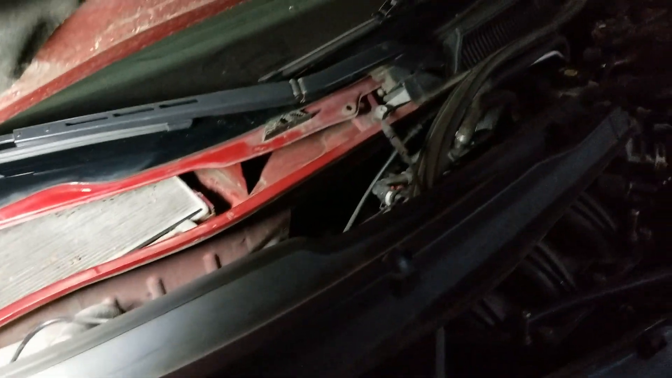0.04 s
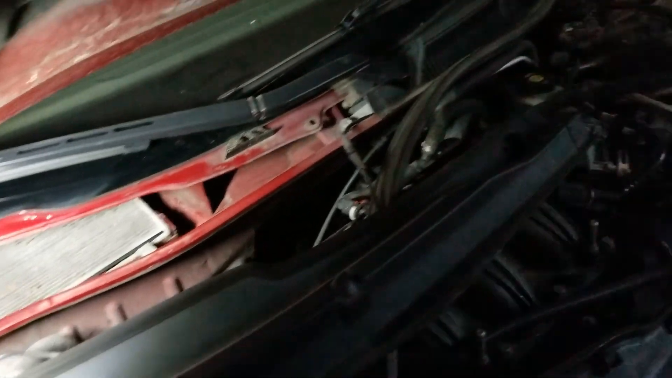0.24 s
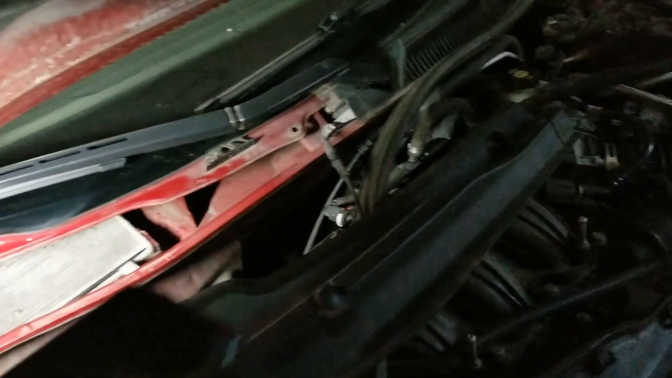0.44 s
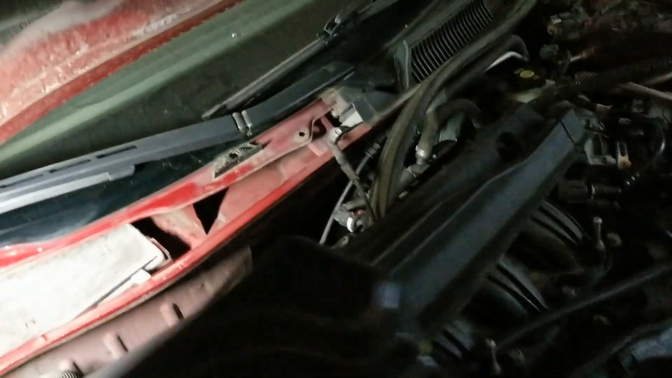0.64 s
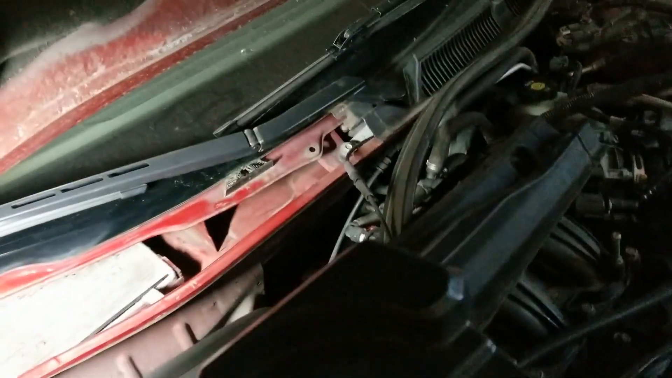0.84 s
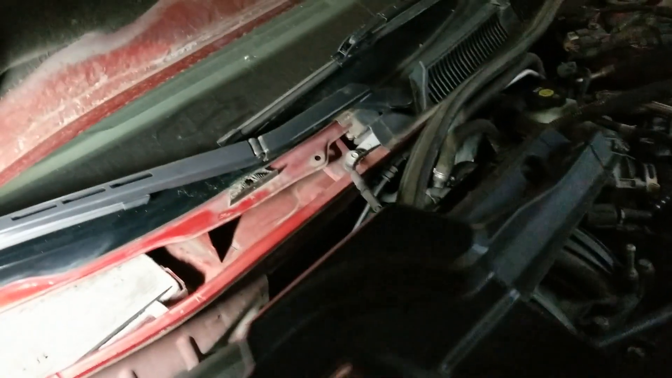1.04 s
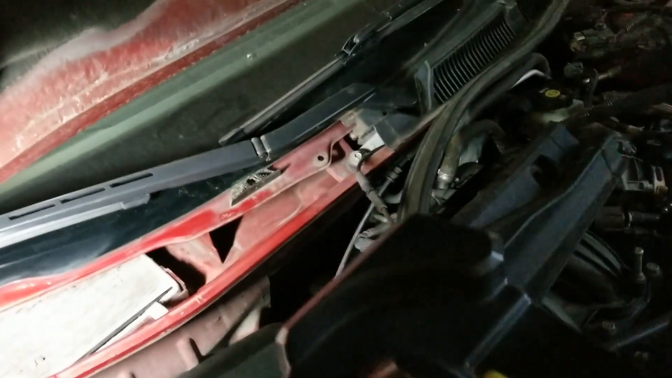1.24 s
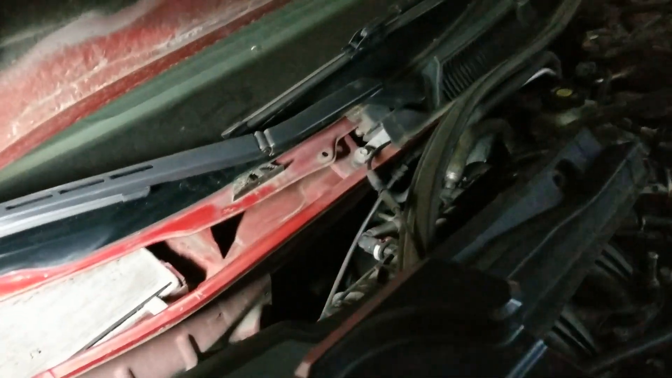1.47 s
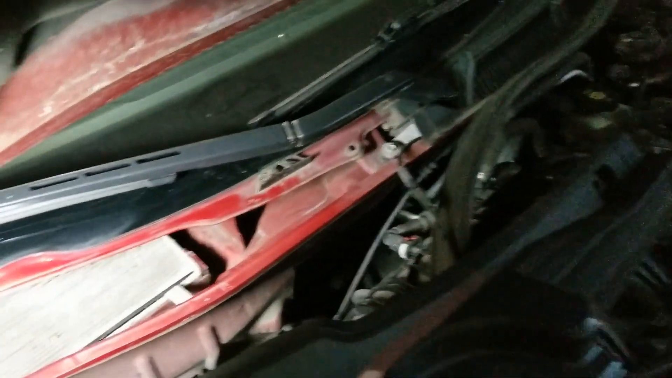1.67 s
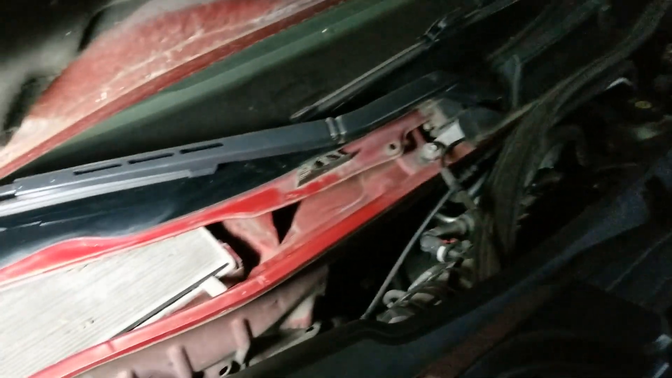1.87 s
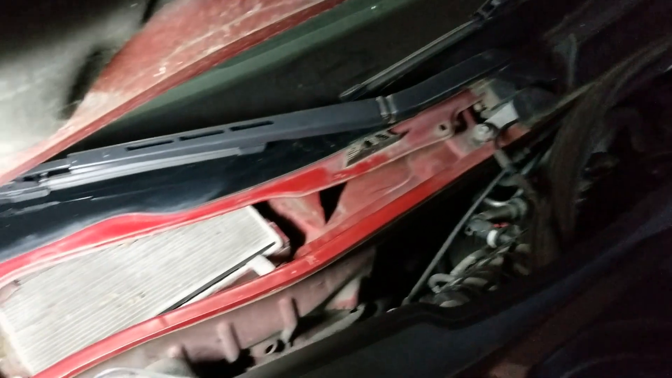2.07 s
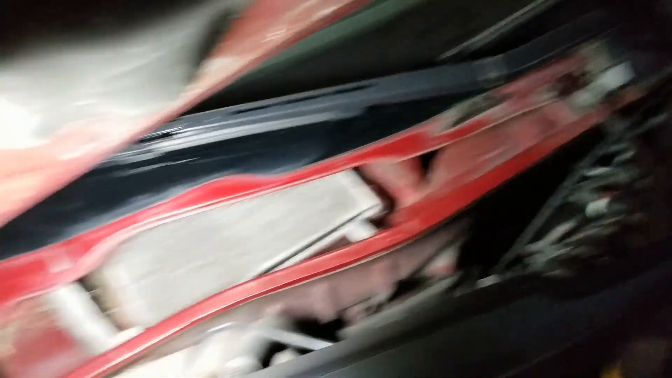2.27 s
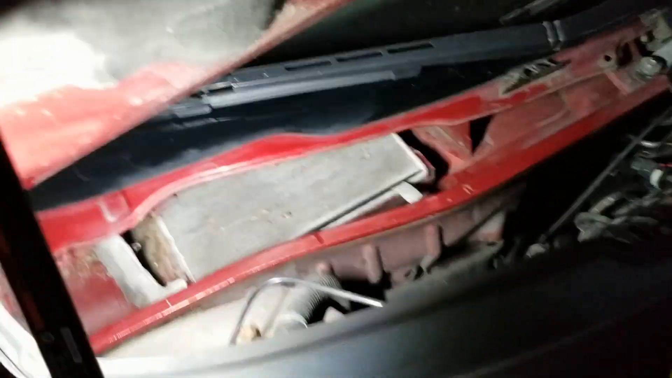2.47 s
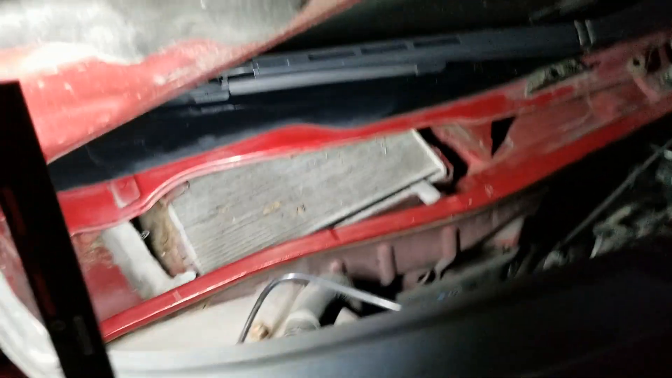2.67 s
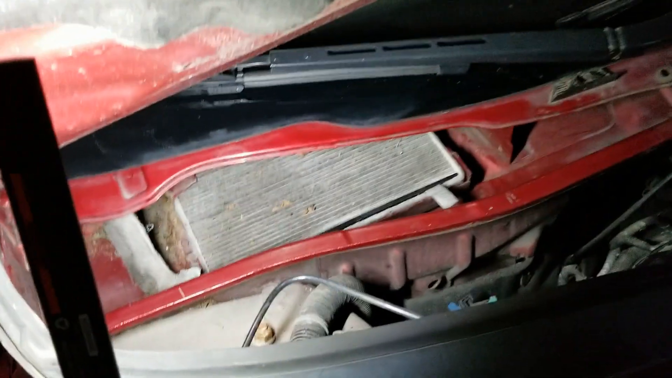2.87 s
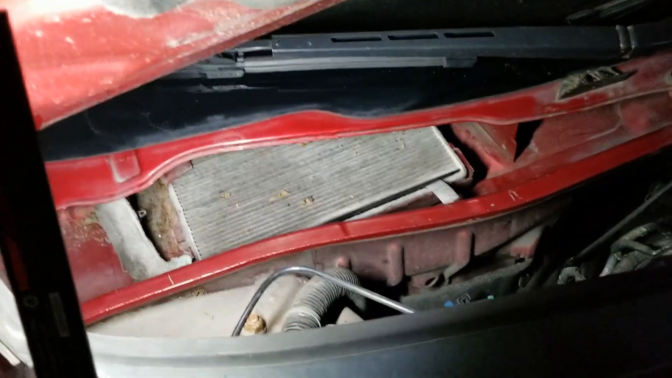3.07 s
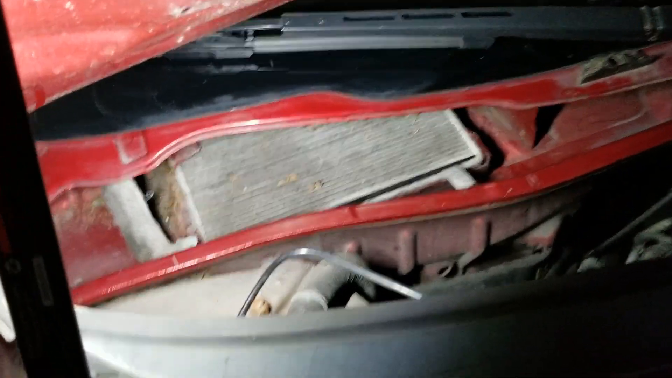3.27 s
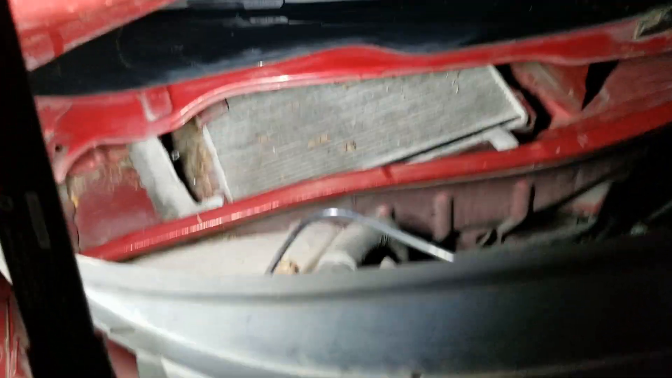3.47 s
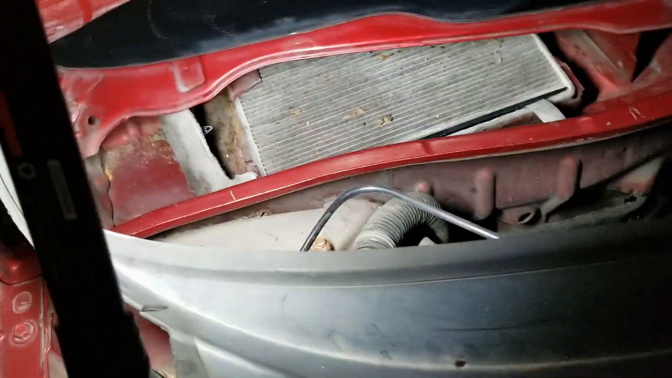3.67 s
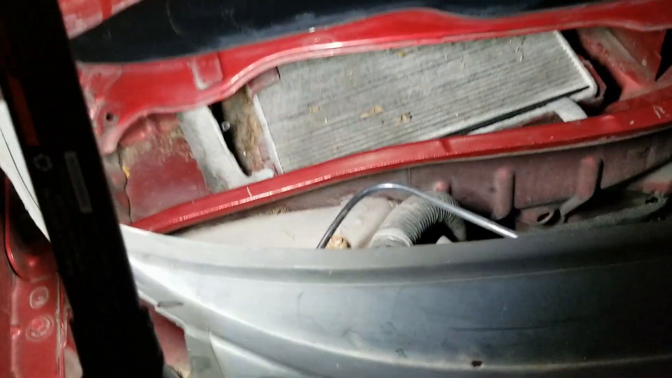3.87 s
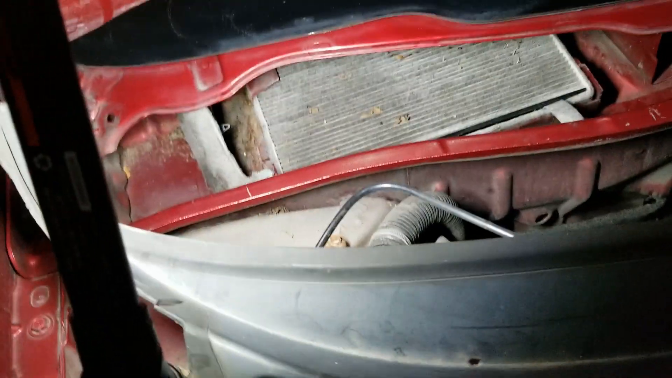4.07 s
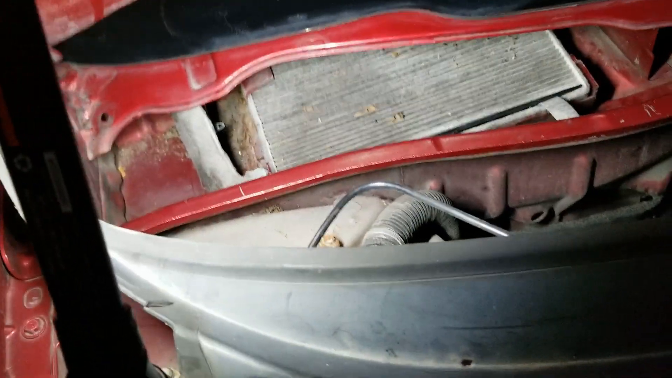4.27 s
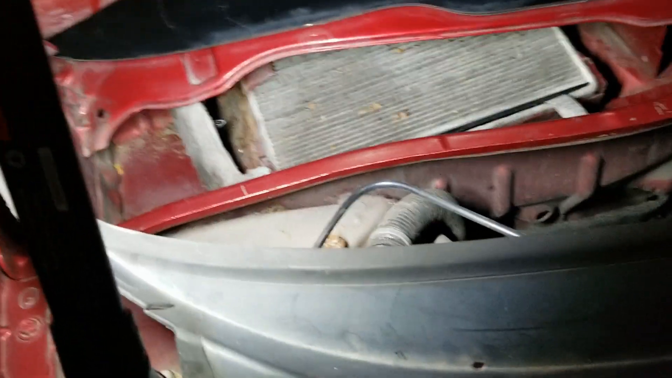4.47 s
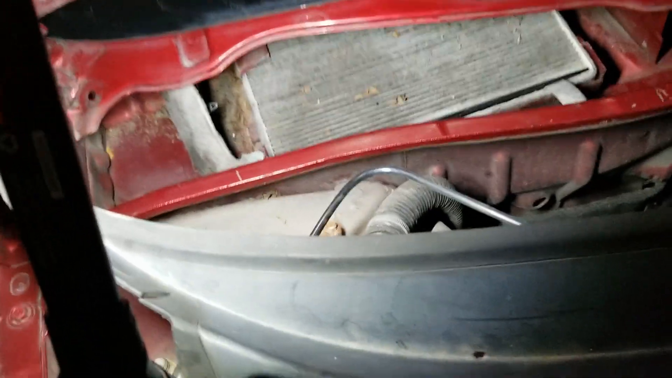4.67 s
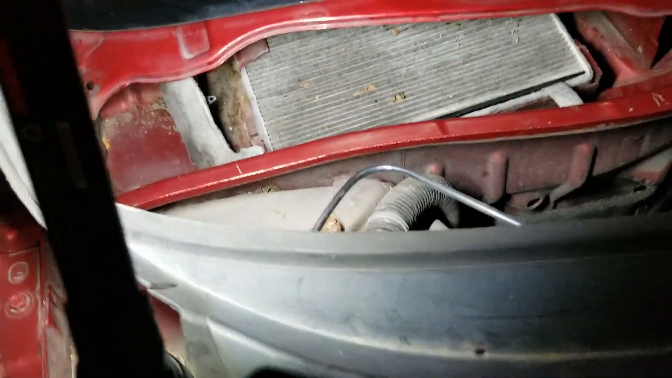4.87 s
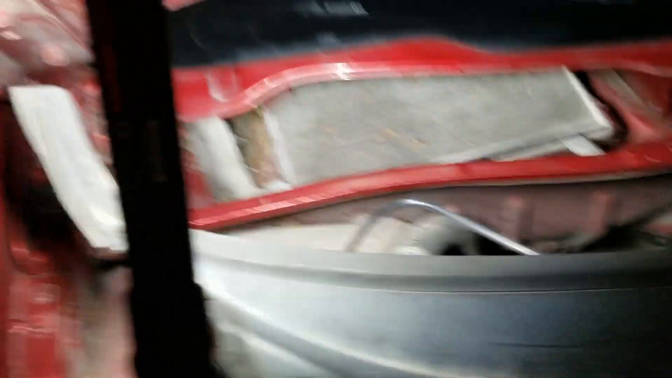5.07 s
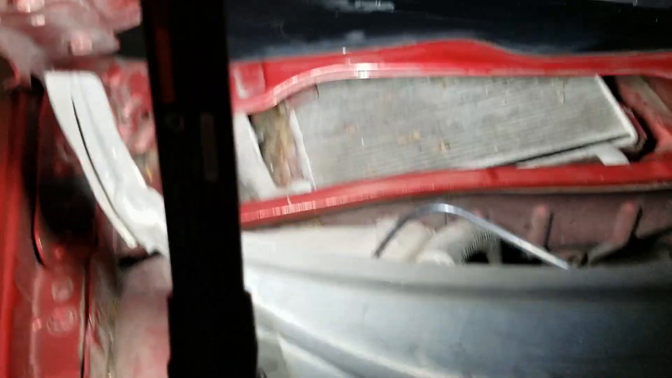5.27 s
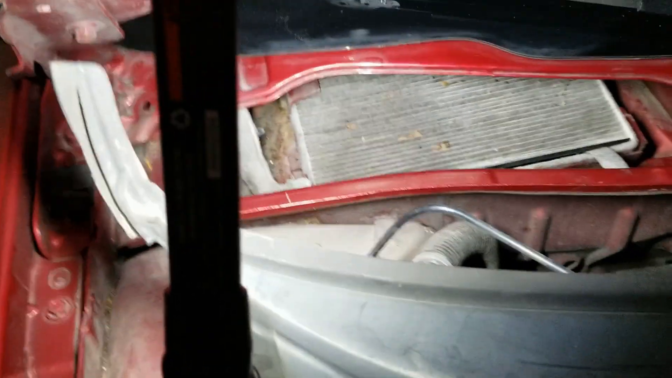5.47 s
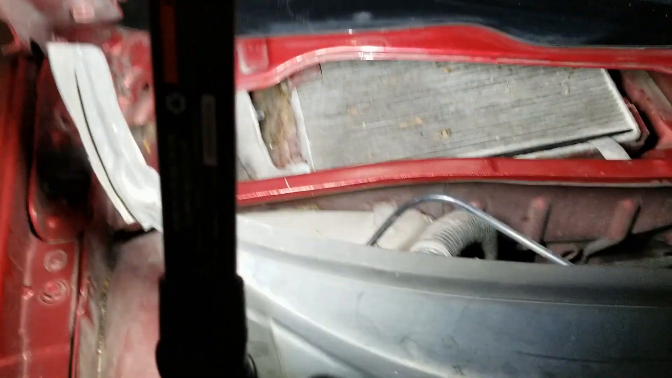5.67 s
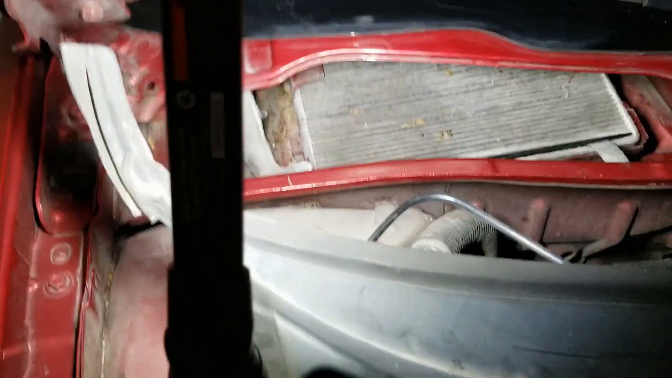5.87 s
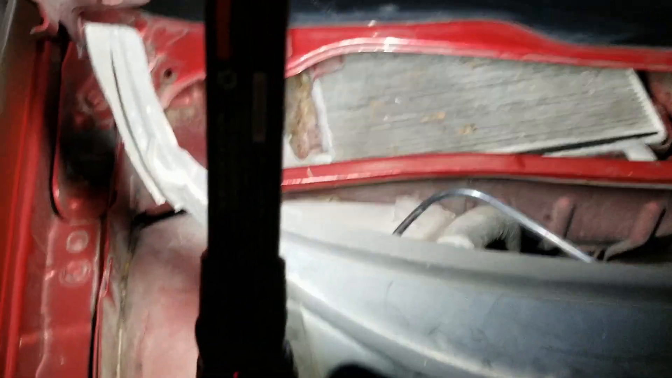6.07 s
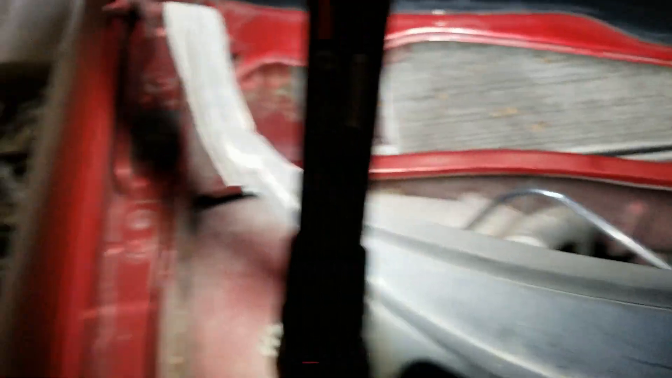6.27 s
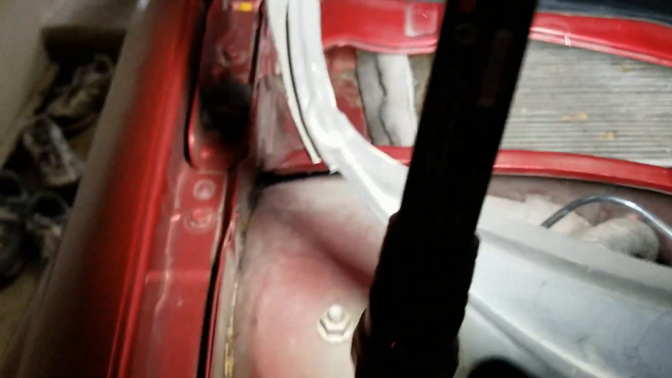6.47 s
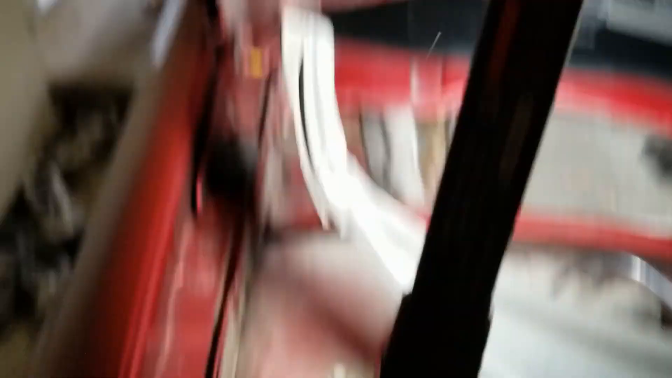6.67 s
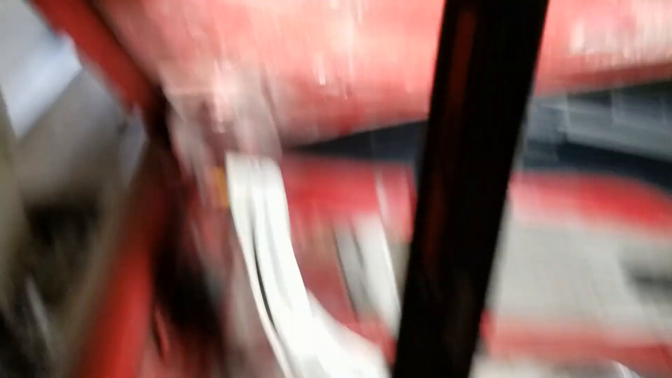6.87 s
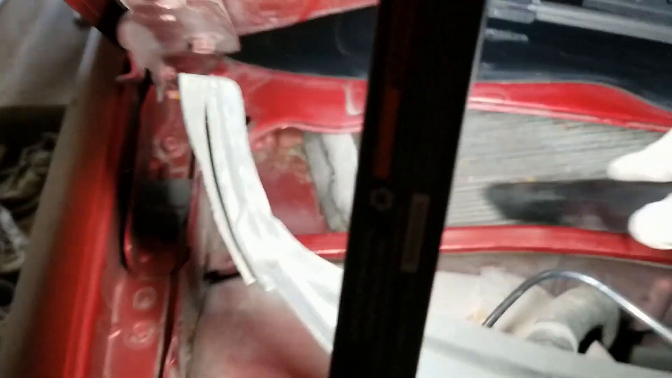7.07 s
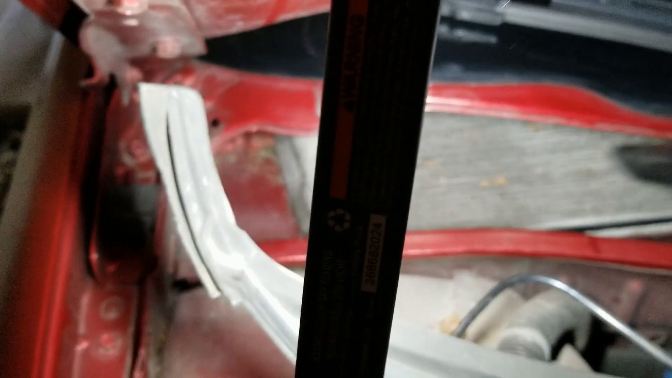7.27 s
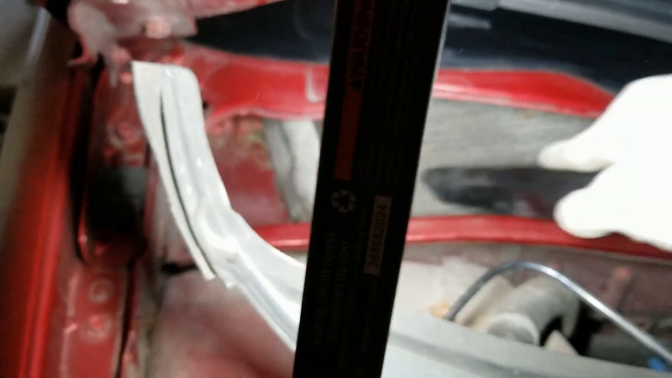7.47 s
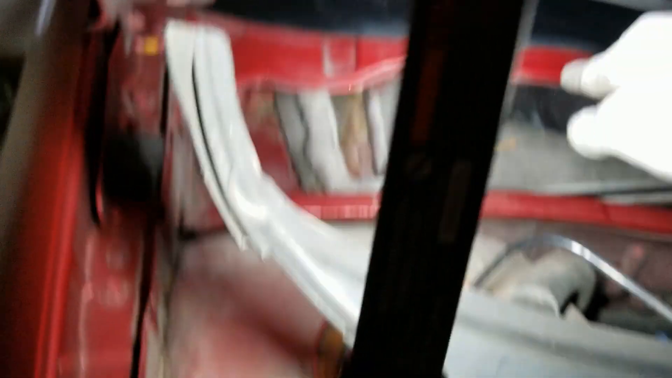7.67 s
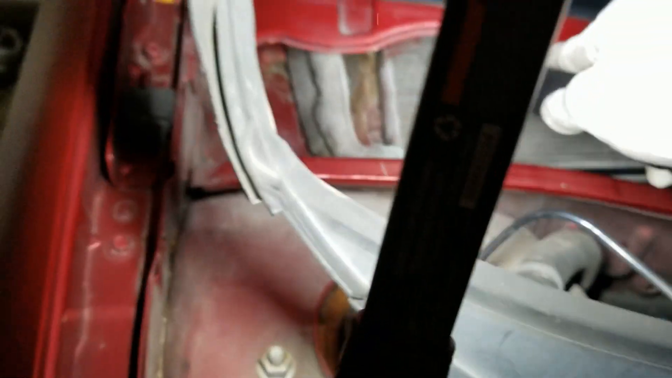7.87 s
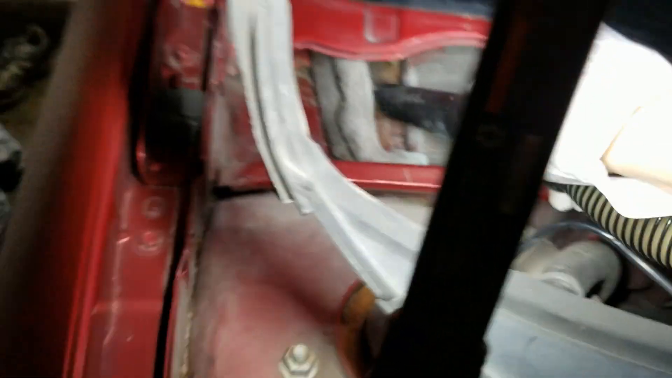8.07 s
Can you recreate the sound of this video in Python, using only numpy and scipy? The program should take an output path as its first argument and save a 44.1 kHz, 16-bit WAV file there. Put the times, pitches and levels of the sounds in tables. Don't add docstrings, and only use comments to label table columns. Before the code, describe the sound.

Four seconds of clunky handling on car panels, a loud click, then a vacuum motor leaps to a piercing steady whine with rushing air and knocks.

```python
import sys
import numpy as np
from scipy import signal
from scipy.fft import rfft, irfft, next_fast_len
from scipy.io import wavfile
from scipy.ndimage import uniform_filter1d

SR = 44100
rng = np.random.default_rng(int(sys.argv[2]) if len(sys.argv) > 2 else 0)


def volts_from_db(level):
    exponent = np.asarray(level, float) / 20
    return 10 ** exponent


def dump(signal):
    limited = np.clip(np.atleast_2d(signal).T, -1, 1)
    pcm = np.round(limited * 32767).astype(np.int16)
    wavfile.write(sys.argv[1], SR, pcm)


N = 358974
TIME = np.arange(N) / SR

# start_s, shaft_hz
RAMP = [
    (4.2, 62.1),
    (4.24, 114.2),
    (4.3, 165.5),
    (4.335, 197),
    (4.4, 247.8),
    (4.45, 283),
]
# start_s, shaft_hz
LOAD = [
    (5.1, 343.1),
    (5.5, 343.6),
    (6.85, 343.4),
    (7.0, 343.7),
    (7.75, 343.9),
    (8.14, 343.4),
]
SETTLE_S, FULL_HZ, BLADES = 0.14, 343.5, 9
SHAFT_DB, SHAFT_LOSS_DB, BLADE_LOSS_DB = -28.5, 9, 11.5
# order_ratio, level_db
ORDERS_DB = [(2, -43.5), (2.632, -45.5), (4.325, -54.5), (7, -59), (8, -46), (10, -44), (11, -55),
             (12, -48.5), (15, -51), (16, -60), (17, -56), (19, -58), (20, -61), (22, -62), (23, -59),
             (25, -60)]
# level_db, loss_db (per squared halving of speed)
OVERTONES = [(-55, 10), (-46, 30), (-44.5, 70), (-50, 120)]
# order_number, pitch_hz, width_hz, level_db
SWELLS = [(3, 868, 44, 28), (7, 1650, 210, 39), (7, 1790, 91, 26), (12, 2900, 530, 21), (18, 4480, 180, 20),
          (18, 4860, 250, 25), (18, 5240, 580, 15.5), (18, 5860, 400, 17), (27, 6800, 550, 17.5),
          (27, 7740, 440, 11.5), (27, 8550, 330, 12)]
# start_s, level_db
FIFTH = [(4.25, -50), (4.33, -43), (4.37, -35), (4.4, -32.5), (4.413, -22.5), (4.425, -34), (4.49, -47),
         (4.53, -38.5), (4.67, -31.5), (4.76, -38), (4.86, -35), (5.05, -37.5), (5.2, -39), (5.5, -42),
         (6.2, -42), (6.4, -42), (7.4, -40), (8.14, -40)]
# pitch_hz, width_hz, level_db
CANISTER = [(185, 40, 9), (259.6, 75, 14.5), (326, 15, -8)]
# pitch_hz, width_hz, level_db
STANDING = [(2150, 130, 7), (2440, 210, -6), (2596, 70, 8), (2880, 22, -7), (3020, 7.3, -13),
            (2680, 120, 14), (2828, 29, 9), (2969, 67, 12), (3023, 24, 7)]
# start_s, level_db, left_minus_right_db, left_lag_rad
WHINE = [(4.2, -28, 11.5, 2.2), (4.71, -28.5, 1, 1.67), (4.8, -27.5, 15.5, 2.8), (4.92, -24.5, 4.5, 4.05),
         (5.0, -34, -8, 2.6), (5.1, -33, -3, 2), (5.14, -24, 7.5, 2.3), (5.25, -20.5, 4.5, 2.14),
         (5.38, -24, 14, 1.2), (6.05, -22, 5.5, 1.04), (6.42, -24, 14.5, .2), (6.58, -28, 14, 3.1),
         (6.74, -29, 17, 1.87), (6.86, -32, -8, 1.1), (7.05, -25, 0, 0.8), (7.35, -24, 3, 1.37),
         (7.7, -23, 5.5, 0.55), (8.14, -22.5, 2.5, 0.2)]
# centre_s, width_s, level_db
FADES = [
    (4.722, 0.019, -16),
    (5.12, .015, -15),
    (6.261, .04, 1.5),
    (6.307, 0.043, -3),
    (7.275, .12, -0.5),
    (7.86, 0.15, -4),
]
# start_s, air_db, hum_db, left_minus_right_db
POSE = [
    (4.2, 0, -11.5, 0.5),
    (4.5, 0, -3, 2.5),
    (5.25, 1, 1, 3.5),
    (5.45, -1, 1, 6),
    (6.1, -1, 0.5, 2.5),
    (6.6, -2, 3, 1.5),
    (8.14, -2, 5, 2.5),
]
# start_s, pitch_hz, level_db
SQUEALS = [
    [(4.281, 1435, -42), (4.292, 1700, -29), (4.303, 2000, -31), (4.316, 2150, -38)],
    [(4.274, 1093, -40), (4.284, 1240, -28), (4.312, 1260, -35)],
    [(4.262, 1500, -44), (4.28, 1850, -35), (4.29, 1800, -42)],
]

# pitch_hz, density_db (per Hz)
AIR_COLOUR = [(40, -20), (100, -4), (250, 0), (450, -4.5), (700, -11.5), (1000, -15), (2400, -12),
              (3300, -12.5), (4500, -15.5), (6300, -19.5), (8500, -15), (10200, -17), (12500, -14.5),
              (15800, -20.5)]
# pitch_hz, likeness_0_to_1
AIR_ALIKE = [(60, 0.7), (130, 0.99), (290, 0.91), (640, 0.17), (1410, 0.24), (3100, 0.06), (6820, 0.4),
             (9000, 0.55), (15000, 0.55)]
# pitch_hz, width_hz, level_db
DUCTS = [(1115, 157, 7), (1468, 90, 6), (2940, 200, 4), (3180, 190, -1.5), (3960, 550, 9), (4420, 240, -6),
         (5280, 1180, 8), (6340, 250, 0.5), (6390, 240, 4), (7200, 400, -2.5), (7630, 320, 3.5)]
# pitch_hz, lag_rad
PORTS = [(1100, 0), (3400, .6), (6700, 4 * np.pi)]
ROAR_DB, RUSH_DB, HISS_DB, HISS_LOSS_DB = -34, -28.5, -31, 12
RUSH_STARTS_S, RUSH_RISE_S, RUSH_TOP_HZ = 4.24, 0.035, 1930

# start_s, peak_db, ring_hz, clatter_db (over ring), t60_s
THUMPS = [(0.004, -18, 235, -12, 0.089), (0.038, -25, 200, -15, 0.15), (0.292, -25.5, 260, -12, 0.097),
          (0.319, -34, 70, -30, .25), (0.503, -39, 111.4, 1, 0.35), (1.013, -41, 200, -20, 0.11),
          (1.04, -43, 114, -30, 0.18), (1.209, -37.5, 107, -15, .15), (1.283, -30.5, 118, -9, 0.17),
          (1.329, -22.5, 111.7, -14, 0.31), (1.396, -31.5, 152, -12, 0.17), (1.477, -9, 198, -13, .07),
          (1.498, -20, 200, -32, 0.13), (1.519, -18.5, 114.5, -7.5, 0.34), (1.53, -19, 270, -25, .08),
          (1.583, -18, 115, -9, 0.21), (1.667, -24.5, 126, -15, 0.069), (1.69, -28.5, 111, -31, 0.19),
          (1.99, -35, 133.4, -4, .15), (2.516, -29, 62, -40, .07), (2.7115, -19.5, 83.5, -40, 0.064),
          (3.113, -27.5, 158.6, -7, 0.18), (3.244, -27, 195, 0, 0.24), (3.512, -31, 163, -34, .25),
          (3.657, -33.5, 297, -14, .1), (3.69, -25.5, 177, -28, 0.084), (3.716, -29.5, 200, -30, 0.12),
          (3.786, -22.5, 193, -20, 0.079), (3.8, -16, 201, -1.5, 0.11), (4.029, -41, 270, -7, 0.1),
          (4.207, -18.5, 340, -18, 0.032), (4.226, -25, 295, -13, 0.05), (4.721, -18.5, 303, -1, 0.095),
          (4.772, -19.5, 309, -20, 0.14), (5.294, -12.5, 300, -8, 0.096), (5.366, -11, 291, -4, 0.088),
          (5.769, -17, 179.6, 2, 0.076), (6.34, -13, 283, -2.5, 0.11), (7.114, -14.5, 514, -7, 0.11),
          (7.689, -17.5, 352, 4.5, 0.1)]
# pitch_ratio, level_db, t60_share
PANEL = [(1, 0, 0.9), (0.591, -8.5, 0.85), (1.5, -8.5, 0.66), (2.6, -17, 0.6), (3.9, -22.5, 0.44)]
# start_s, peak_db, pitch_hz, top_db (over body), left_minus_right_db
TICKS = [(1.1143, -35.5, 2900, 1.5, 0), (1.437, -36, 1780, -19, -4), (1.4644, -18, 1460, -25, 5),
         (1.4672, -18, 1100, -25, -1), (1.4748, -23.5, 2170, -25, 0), (1.518, -20, 1050, -9, 0),
         (1.58, -32, 900, -20, -3), (1.5846, -29, 2740, 0, -4), (1.7572, -44, 2680, 4, -1),
         (1.587, -25, 2460, -6, 5), (2.0925, -47, 1930, -14, 0), (2.1776, -44, 3550, -15, -1),
         (2.387, -46, 2360, 8, -1), (2.5097, -30, 2530, -5, 18), (2.588, -26.5, 1510, -8, -11),
         (2.627, -33, 2370, -21, 0), (2.709, -26, 1600, -24, -16), (3.236, -27, 2500, -20, -1),
         (3.241, -29, 2300, -20, 2), (3.249, -24, 1520, 0.5, -6), (3.556, -43, 2500, -25, 4),
         (3.118, -44, 1150, -15, -1), (3.8013, -23.5, 1230, -6, -7), (4.707, -13, 1098, -15, 0),
         (5.371, -15, 1100, -25, 2), (7.112, -19, 1400, -25, 3), (3.919, -35.5, 1260, 2, 0),
         (4.16, -42, 1390, -9, -2)]
# start_s, peak_db, pitch_hz, t60_s
CLINKS = [(0.06, -30.5, 190.4, .2), (0.3, -32.5, 180, .25), (5.295, -26, 190, .1), (5.37, -21, 485, .08),
          (7.692, -25, 1900, .05), (0.471, -52, 1030, 0.26), (1.474, -21, 937, .06), (1.484, -31, 500, .1),
          (1.519, -28, 555, 0.11), (1.58, -25, 328, .06), (1.7572, -46, 2680, 0.026),
          (1.795, -52, 2300, .03), (1.992, -42, 1300, 0.042), (2.387, -50, 2420, .04),
          (3.116, -43, 1200, .06), (3.237, -32, 2440, 0.055), (3.25, -33, 1420, 0.057),
          (3.253, -33, 1150, .045), (3.548, -41, 1200, .03), (3.092, -45, 550, .03), (3.113, -34, 484, .07),
          (3.255, -36, 563, 0.06), (1.584, -21, 200, 0.13), (1.44, -34, 800, 0.046),
          (3.802, -31, 1220, .06), (3.802, -33, 1750, 0.066), (3.801, -30, 2504, .05),
          (4.721, -21, 185, .15), (7.118, -23, 250, .12), (7.12, -27, 119.1, 0.13), (7.236, -28, 106, 0.31),
          (7.69, -22, 903, .08)]
# pitch_hz, level_db, t60_s
SWITCH = [(1254, -9, 0.028), (1950, -7, 0.033), (2126, -3.5, .04), (2900, -7, 0.022), (4020, -2, 0.023),
          (4410, -10, .02), (12060, -1.5, .02), (15900, -1, .02)]
SWITCH_S, SWITCH_DB = 4.1995, -2.5
THUD_DB, THUD_HZ, THUD_T60_S = -10, 310, 0.13
CLATTER_HZ, CLATTER_OCT_PER_DB = 1150, 0.04
BAY_T60_S, BAY_DB = 0.1, -12.5
# start_s, peak_db, pitch_hz, left_minus_right_db, t60_s
BUMPS = [
    (2.496, -19.5, 62, 18.5, 0.053),
    (2.588, -35, 92, 7, 0.065),
    (2.7087, -12, 96, -12, 0.041),
    (2.738, -32, 59.2, -18, 0.044),
]
# start_s, peak_db, push_ms, left_minus_right_db
TAPS = [
    (2.4913, -24, 0.09, -5),
    (2.4974, -14, 0.17, 13),
    (2.5007, -17.5, 0.07, 18),
    (2.5093, -12.5, 0.051, 17),
    (2.588, -22, 0.22, -12),
    (2.594, -32, .1, -5),
    (2.7093, -28, 0.2, -8),
    (2.7385, -21, 0.12, -16),
    (2.745, -25.5, 0.18, -14),
]

# start_s, rib_hz, level_db
ZIP = [
    (5.9, 160, -58),
    (5.93, 180, -28),
    (5.98, 273, -24.5),
    (6.01, 340, -31),
    (6.05, 263, -22),
    (6.085, 178, -49),
    (6.115, 250, -42),
    (6.15, 218, -22),
    (6.19, 140, -48),
]
# start_s, length_s, level_db, from_hz, to_hz
RUBS = [
    (2.543, .05, -38, 1890, 3310),
    (2.54, 0.038, -39.5, 1000, 1700),
    (2.68, 0.041, -42, 4300, 4600),
    (3.138, 0.021, -55, 3520, 3300),
    (3.395, .09, -63, 2350, 2400),
    (3.552, .025, -57, 2500, 4530),
    (3.64, 0.19, -60.5, 4750, 4700),
    (3.58, 0.091, -63, 2610, 2820),
    (4.851, 0.56, -37, 1102, 1108),
]
# start_s, length_s, level_db, cloth_db (over hose)
STROKES = [(0, 0.045, -45, -2), (0.097, 0.15, -56, 0), (0.23, .04, -58, 6), (0.262, .03, -54, 4),
           (0.29, .25, -51, 4.5), (0.734, 0.3, -64, 1.5), (0.996, 0.25, -60, -0.5),
           (1.222, 0.08, -55.5, -7), (1.345, .08, -59, -13), (1.433, 0.071, -43.5, -12),
           (1.578, 0.2, -58.5, -5), (1.847, 0.22, -65, 5), (2.06, 0.12, -73, -2), (2.338, 0.2, -62, 4.5),
           (2.517, .11, -41.5, -5.5), (2.674, 0.065, -44.5, -1.5), (2.882, 0.2, -63, 2.5),
           (3.107, 0.12, -55.5, 2.5), (3.306, 0.2, -60.5, -4), (3.547, .08, -56.5, -3.5),
           (3.638, 0.11, -53.5, -4), (3.75, 0.056, -48.5, 0), (3.863, 0.18, -58.5, -1),
           (4.154, 0.044, -47.5, -6)]
# pitch_hz, density_db (per Hz)
HANDS_COLOUR = [(15, -33), (25, 2), (123, -4.5), (170, -9), (222, -6), (403, -13.5), (791, -20.5),
                (905, -17), (1180, -20), (2810, -22), (5980, -28.5), (12100, -27), (15800, -24)]
# pitch_hz, likeness_0_to_1
HANDS_ALIKE = [(60, 0.8), (130, 0.98), (290, 0.82), (640, 0.27), (1410, 0), (3100, 0), (6000, 0),
               (7500, 0.74), (15000, 0.84)]
# pitch_hz, width_hz, level_db
HOLLOW = [(117, 22, 6), (200, 36, 2.5), (1300, 620, -1), (2000, 440, 2)]
# rumble_db, scrape_db, rustle_db
YARD_DB = (-54.5, -66.5, -64.5)
STROKE_IN_S, STROKE_OUT_S, HANDS_OFF_S = 0.0082, 0.14, 4.3
SHAKE_DB, SHAKE_T60_S, DRAG_DB = -19, 0.57, 2
# start_s, level_db
WHISTLE = [
    (.93, -72),
    (1.0, -58),
    (1.38, -57),
    (1.45, -62),
]


def motor():
    hz = shaft_hz()
    halvings = np.log2(FULL_HZ / hz)
    hum_db = curves(POSE)[1]
    blade_db, blade_pan_db, blade_lag = curves(WHINE)
    turn = 2 * np.pi * np.cumsum(hz * (1 + 0.0003 * walk(25))) / SR
    gliding = np.clip(9.0 * (1 - hz / FULL_HZ), 0, 1)

    def tone(order, db, pan_db, lag):
        path = [row[1:] for row in SWELLS if round(row[0]) == round(order)]
        db = db + gliding * (humps(order * hz, path) + 1.05 * walk(45))
        return np.sqrt(2) * volts_from_db(db) * pan(np.sin(order * turn - np.array([lag, 0 * lag])), pan_db)

    shaft_db = SHAFT_DB + hum_db - SHAFT_LOSS_DB * halvings + humps(hz, CANISTER)
    shaft_db = shaft_db + walk(30) + 0.29 * walk(5.4)
    out = tone(1, shaft_db, 1.3 + 0.16 * walk(1.8), 0.34 * walk(1.826))

    fifth_db = curves(FIFTH)[0] + 3.6 + walk(6) + 1.5 * walk(20) + 2.5 * gliding * walk(70)
    out += tone(5, fifth_db, 1.6 * walk(3.1), 1.4 + 0.15 * walk(2.2))

    blade_db = blade_db - BLADE_LOSS_DB * halvings + humps(BLADES * hz, STANDING)
    blade_db = blade_db + humps(TIME, FADES) + 0.56 * walk(30)
    out += tone(BLADES, blade_db, blade_pan_db, blade_lag)
    for harmonic, (db, loss_db) in enumerate(OVERTONES, 2):
        db = db - loss_db * halvings ** 2 + 1.5 * walk(3) + 2.6 * walk(14)
        out += tone(BLADES * harmonic, db, 1.8 * walk(3.3), 0.3 * walk(1.5))

    for order, db in ORDERS_DB:
        db = db + (order == 2) * (hum_db - 2)
        db = db - (6.8 + 0.4 * order) * gliding + 1.8 * walk(5)
        out += tone(order, db, 2.2 * walk(2), min(order / 8, 0.6) * walk(1.5))
    return out * while_on(POSE) + sum(glide(squeal, 0.032, -25) for squeal in SQUEALS)


def shaft_hz():
    load = curves(LOAD)[0]
    end_s, end_hz = RAMP[-1]
    settling = load - (load - end_hz) * np.exp(-np.maximum(TIME - end_s, 0) / SETTLE_S)
    return np.where(TIME < end_s, curves(RAMP)[0], settling)


def air():
    near_db, hum_db, pan_db = curves(POSE)
    speed = shaft_hz() / FULL_HZ
    flow = np.clip((TIME - RUSH_STARTS_S) / RUSH_RISE_S, 0.15, 1)
    roar = wash(AIR_COLOUR, AIR_ALIKE, 36.0, 300, 1.7)
    roar = volts_from_db(ROAR_DB + near_db + 0.27 * hum_db) * roar
    rush = wash(AIR_COLOUR, AIR_ALIKE, 393, 3200, 0.59, DUCTS, count=5, rate=6)
    rush = volts_from_db(RUSH_DB + near_db) * flow * rush
    top = butter(rush, 1, RUSH_TOP_HZ, "high")
    rush = rush - top * (1 - np.clip(speed, 0, 1) ** 0.94)
    hiss = wash(AIR_COLOUR, AIR_ALIKE, 3600, 16500, 3.0, DUCTS, count=18, rate=7)
    hiss = volts_from_db(HISS_DB + 0.51 * near_db + HISS_LOSS_DB * np.log2(speed)) * hiss
    return (roar + pan(rush, pan_db) + pan(hiss, 1.2)) * while_on(POSE)


def knocks():
    out = np.zeros((2, N))
    for s, db, hz, clatter_db, t60 in THUMPS:
        octaves = CLATTER_OCT_PER_DB * np.clip(db + clatter_db + 31, -15, 5)
        modes = [(hz * ratio, mode_db, t60 * share) for ratio, mode_db, share in PANEL]
        body = ring(modes, 0.018 * rng.standard_normal(8), 0.0058)
        thud = crack(THUD_HZ, 1.48, THUD_T60_S).mean(0)
        add(out, volts_from_db(db) * pan(body + volts_from_db(THUD_DB) * thud, 1.4), s)
        add(out, volts_from_db(db + clatter_db) * crack(CLATTER_HZ * 2 ** octaves, 2.44, 0.042), s)
    for s, db, hz, top_db, pan_db in TICKS:
        tick = crack(hz, 1.67, 0.013) + volts_from_db(top_db) * crack(10500, 1.6, 0.004)
        add(out, volts_from_db(db) * pan(tick, pan_db), s)
    for s, db, hz, t60 in CLINKS:
        modes = [(hz, 0, t60), (1.07 * hz, -5, t60)]
        clink = np.array([ring(modes, 0.017 * rng.standard_normal(2), 0.0026) for _ in "lr"])
        add(out, volts_from_db(db) * clink, s)
    snap = np.array([ring(SWITCH, 0.013 * rng.standard_normal(8), 0.00032) for _ in "lr"])
    add(out, volts_from_db(SWITCH_DB) * (snap + 0.34 * crack(2240, 2.3, 0.033)), SWITCH_S)
    return out


def bay_echo(hits):
    t = np.arange(SR // 2) / SR
    alike, apart = rng.standard_normal((2, len(t)))
    apart = butter(apart, 1, 450, "high")
    tail = signal.lfilter([0.4], [1, -0.6], [alike + apart, alike - apart])
    tail = tail * 1000. ** (-t / BAY_T60_S) * (t > 0.004)
    tail = tail / np.sqrt(np.sum(tail ** 2) / 2)
    return volts_from_db(BAY_DB) * signal.fftconvolve(hits, tail, axes=1)[:, :N]


def bumps():
    out = np.zeros((2, N))
    for s, db, hz, pan_db, t60 in BUMPS:
        modes = [(hz, 0, t60), (2.0 * hz, -3, 0.15 * t60), (5.9 * hz, -9, 0.27 * t60)]
        add(out, -volts_from_db(db) * pan(ring(modes, np.zeros(3), 0.00062), pan_db), s)
    return out


def taps():
    out = np.zeros((2, N))
    t_ms = np.arange(400) / SR * 1000
    for s, db, push_ms, pan_db in TAPS:
        push = t_ms / push_ms
        pulse = push * np.exp(1 - push) - 0.3 * push / 4 * np.exp(1 - push / 4)
        add(out, -volts_from_db(db) * pan(pulse, pan_db), s)
    return out


def hose_zip():
    return volts_from_db(2.8 * walk(90)) * glide(ZIP, 0.0239, -17)


def rubs():
    out = np.zeros((2, N))
    for s, length, db, from_hz, to_hz in RUBS:
        share = np.arange(int(length * SR)) / (length * SR)
        turn = 2 * np.pi * np.cumsum(from_hz + (to_hz - from_hz) * share) / SR
        slow = butter(rng.standard_normal((2, 2, SR)), 2, 0.2 * from_hz, "low")
        a, b = slow[..., 500:len(share) + 500]
        y = a * np.sin(turn) + b * np.cos(turn)
        add(out, volts_from_db(db) * y / y.std() * np.sqrt(np.sin(np.pi * share)), s)
    return out


def hands():
    shake, drag, cloth = (volts_from_db(db) ** 2 for db in YARD_DB)
    for s, length, db, cloth_db in STROKES:
        rise = (TIME - s) / STROKE_IN_S + 0.5
        fall = (s + length - TIME) / STROKE_OUT_S + 1
        power = volts_from_db(db) ** 2 * np.clip(np.minimum(rise, fall), 0, 1) ** 4
        shake = shake + volts_from_db(DRAG_DB) ** 2 * power
        drag = drag + power
        cloth = cloth + volts_from_db(cloth_db) ** 2 * power
    for s, db, *_ in THUMPS:
        decay_db = 60 * np.abs(TIME - s) / SHAKE_T60_S
        shake = shake + (TIME > s) * volts_from_db(db + SHAKE_DB - decay_db) ** 2
    slips = volts_from_db(1.5 * rng.exponential(size=N // 128 + 1)).repeat(128)[:N]
    slips = uniform_filter1d(slips, 200)
    slips = slips / np.sqrt(np.mean(slips ** 2))
    rumble = wash(HANDS_COLOUR, HANDS_ALIKE, 26.4, 300, 3.8, HOLLOW)
    rumble = np.sqrt(shake) * volts_from_db(2.45 * walk(25.08)) * rumble
    scrape = np.sqrt(drag) * slips * wash(HANDS_COLOUR, HANDS_ALIKE, 400, 5200, 1.8, HOLLOW, count=4)
    rustle = wash(HANDS_COLOUR, HANDS_ALIKE, 6200, 19000, 0.65)
    rustle = np.sqrt(cloth) * volts_from_db(0.7) * slips ** 0.5 * rustle
    return (rumble + scrape + rustle) * np.clip((HANDS_OFF_S - TIME) / 0.1, 0, 1)


def whistle():
    y = butter(rng.standard_normal((2, N)), 2, [2850, 2950], "band")
    return volts_from_db(curves(WHISTLE)[0]) * y / y.std() * while_on(WHISTLE)


def wash(colour, alike, lo_hz, hi_hz, flicker_db, ducts=(), count=2, rate=9):
    size = next_fast_len(N)
    hz = np.arange(1, size // 2 + 2) * SR / size
    shape = volts_from_db(on_log(hz, colour) + humps(hz, ducts))
    c = np.clip(on_log(hz, alike), 0, 1)
    mid, side = rfft(rng.standard_normal((2, size))) * shape * np.sqrt([1 + c, 1 - c])
    ports = np.array([(mid + side) * np.exp(-1j * on_log(hz, PORTS)), mid - side])
    out = 0
    for k in range(int(count * np.log2(hi_hz / lo_hz)) + 1):
        band = np.cos(np.pi / 2 * np.clip(count * np.log2(hz / lo_hz) - k, -1, 1))
        out = out + irfft(ports * band, size)[:, :N] * volts_from_db(flicker_db * walk(rate))
    return out / np.sqrt(np.mean(out.mean(0) ** 2))


def glide(table, rough, second_db):
    hz, db = curves(table)
    turn = 2 * np.pi * np.cumsum(hz * (1 + rough * walk(60))) / SR
    wave = np.sin(turn) + volts_from_db(second_db) * np.sin(2 * turn)
    return np.sqrt(2) * volts_from_db(db + 3.7 * walk(40)) * wave * while_on(table)


def ring(modes, jitter, push_s):
    t = np.arange(SR // 2) / SR
    y = 0
    for (hz, db, t60), detune in zip(modes, jitter):
        y = y + volts_from_db(db) * np.sin(2 * np.pi * hz * (1 + detune) * t) * 1000. ** (-t / t60)
    y = y * np.minimum(t / push_s, 1)
    return y / np.abs(y).max()


def crack(hz, width, t60):
    t = np.arange(SR // 2) / SR
    y = rng.standard_normal(len(t)) + 1.1 * rng.standard_normal((2, len(t)))
    y = y * np.minimum(t / (0.071 * t60), 1) * 1000. ** (-t / t60)
    y = butter(y, 3, [hz / width, min(hz * width, 20000)], "band")
    return y / np.abs(y.mean(0)).max()


def humps(hz, table):
    return sum(db / (1 + (2 * (hz - f) / w) ** 2) for f, w, db in table)


def walk(rate):
    k = int(SR / rate)
    steps = np.repeat(rng.standard_normal(N // k + 1), k)
    return 1.42 * uniform_filter1d(uniform_filter1d(steps, k), k)[:N]


def butter(x, order, hz, kind):
    return signal.sosfilt(signal.butter(order, hz, kind, fs=SR, output="sos"), x)


def pan(x, left_minus_right_db):
    half = np.atleast_1d(left_minus_right_db) / 2
    return x * volts_from_db(np.array([half, -half]))


def curves(table):
    s, *columns = np.transpose(table)
    return [np.interp(TIME, s, c) for c in columns]


def while_on(table):
    return np.clip((TIME - table[0][0]) / 0.009, 0, 1) * (TIME <= table[-1][0] + 0.01)


def on_log(hz, table):
    table_hz, value = np.transpose(table)
    return np.interp(np.log(hz), np.log(np.maximum(table_hz, 1)), value)


def add(out, sound, s):
    i = int(s * SR)
    out[:, i:i + sound.shape[1]] += sound[:, :N - i]


def scene():
    hits = knocks()
    struck = hits + bay_echo(hits) + bumps() + taps()
    rubbed = hose_zip() + rubs() + hands()
    return motor() + air() + struck + rubbed + whistle()


def top_cut(x):
    return signal.sosfilt(signal.butter(12, 16000, fs=SR, output="sos"), x)


def record(dry):
    x = butter(dry, 2, 38, "high")
    x = signal.sosfilt(signal.ellip(10, 0.2, 70, 15740, fs=SR, output="sos"), x)
    mix = np.clip(x, -1, 1)
    return top_cut(mix)


dry = scene()
out = record(dry)
dump(out)
```